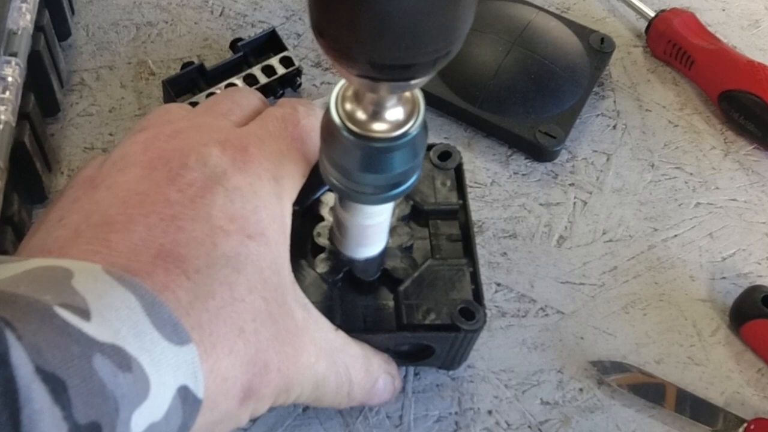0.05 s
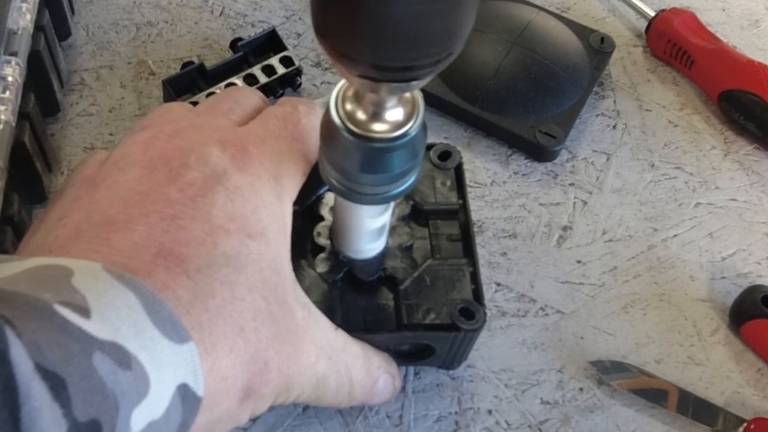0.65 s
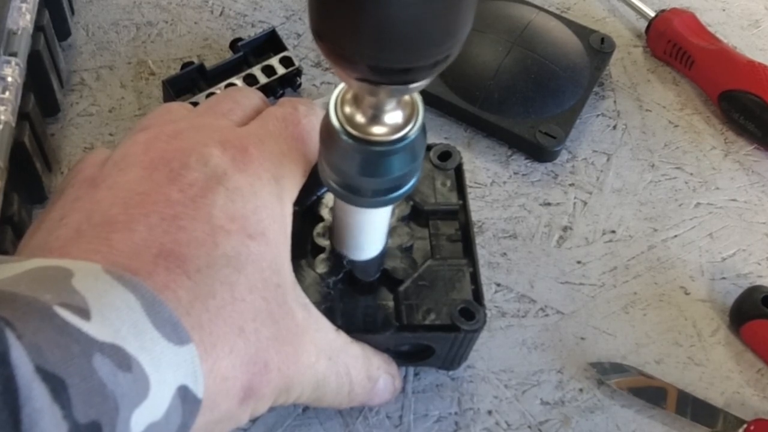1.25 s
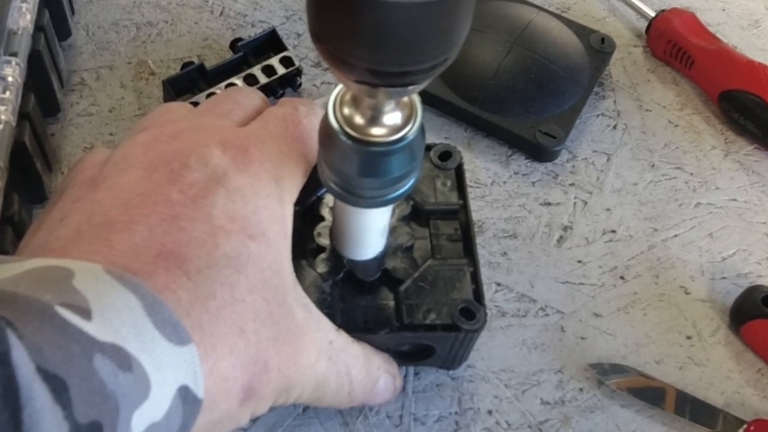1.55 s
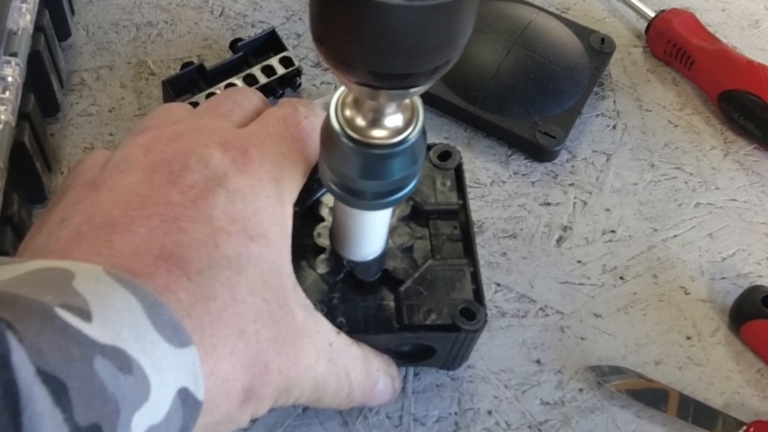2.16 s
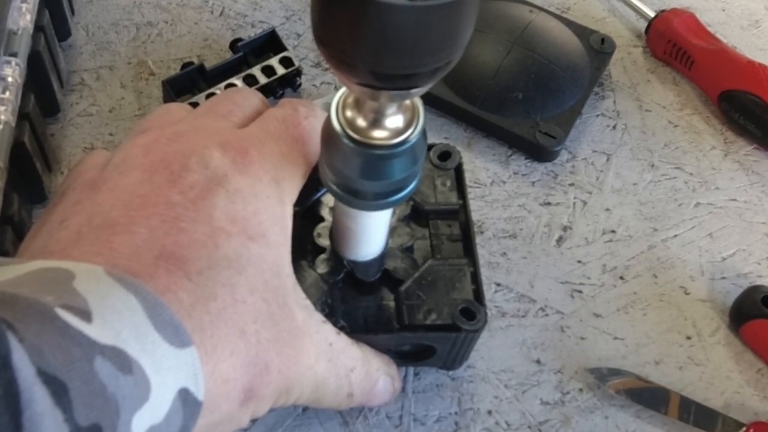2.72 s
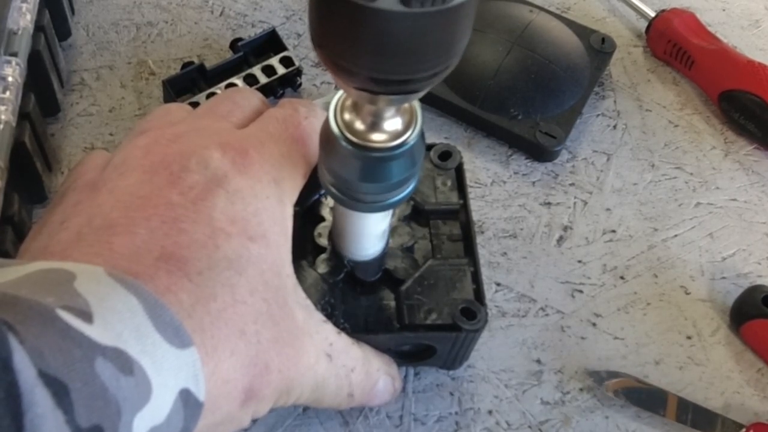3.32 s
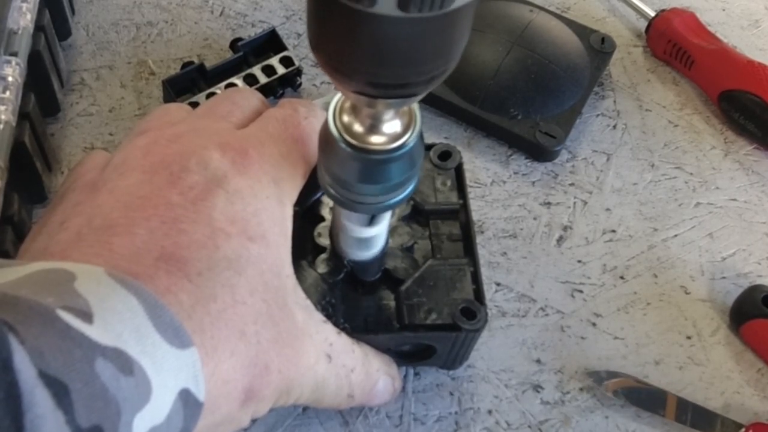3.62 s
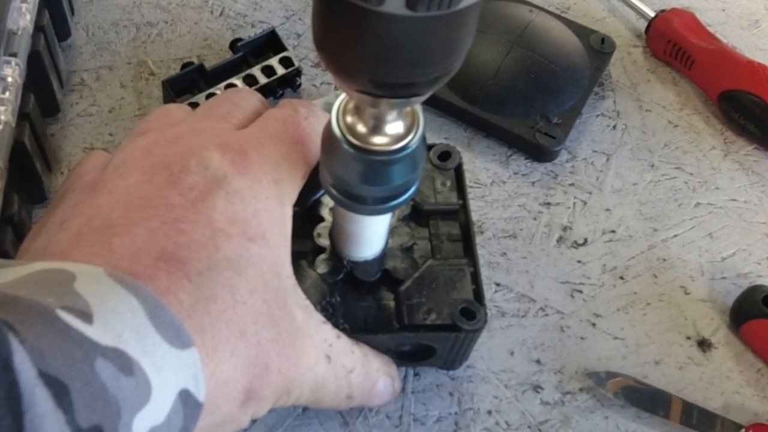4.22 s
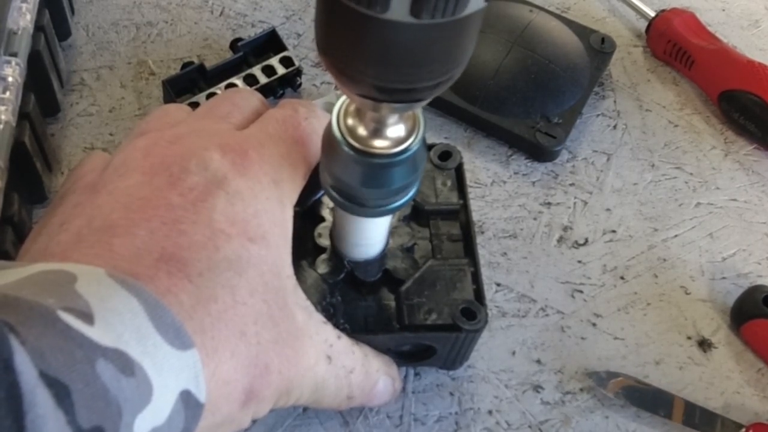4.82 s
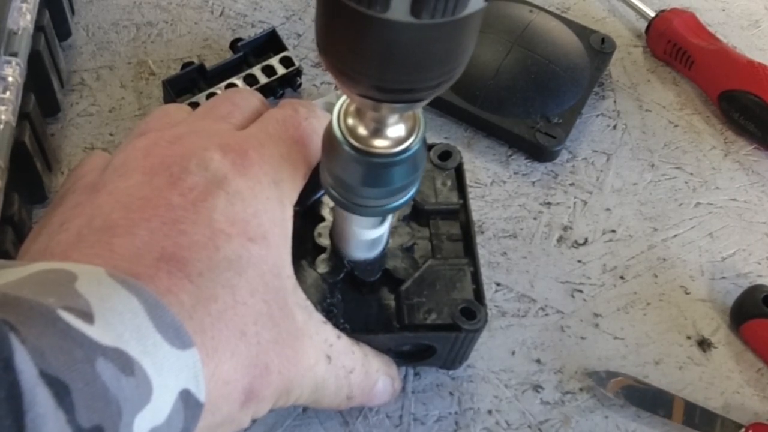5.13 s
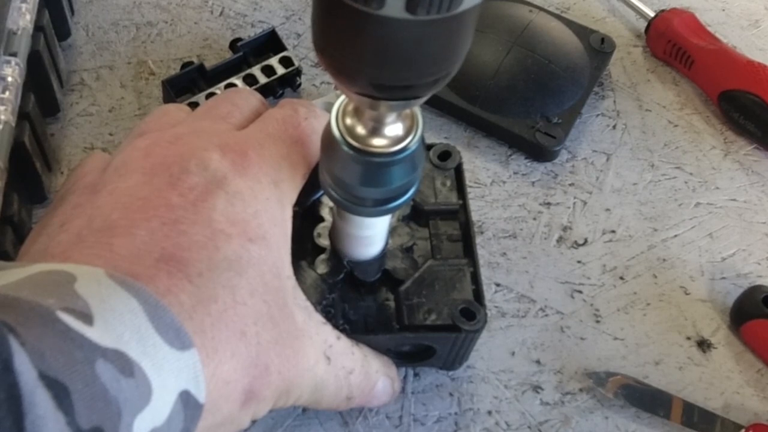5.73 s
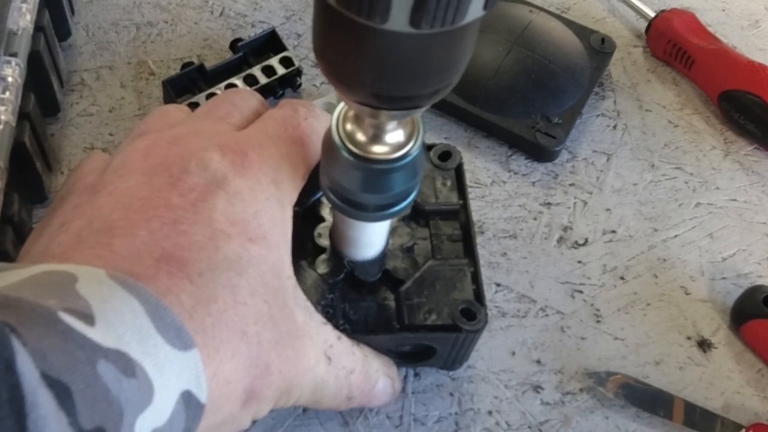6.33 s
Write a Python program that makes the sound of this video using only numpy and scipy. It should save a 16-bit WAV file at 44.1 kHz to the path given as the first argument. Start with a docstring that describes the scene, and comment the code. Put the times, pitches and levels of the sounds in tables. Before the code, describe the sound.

A cordless drill revs at once with a tiny gear chirp, then winds down until about 0.5 seconds. It runs briefly at part speed and reaches full speed by 0.8 seconds. From there it holds a high, throbbing gear whine with a steady motor hiss and a light rattle in its housing. A small hole saw scrapes into a plastic box, catching in a quick, even rhythm as it turns and biting firmly around 1.6 seconds. Harsher rubbing comes in spells near 2.7 seconds and from 3.3 to 4.4 seconds. A low chattering hum from the teeth grows until about 4.5 seconds, then calms as the saw sinks in. The box and workbench rumble underneath, with soft, rapid thumps around 2.4 seconds and near the end. The drill sags slightly in pitch and is still running at about 6.4 seconds. It sounds close, in a quiet workshop.

```python
"""A cordless drill whines and scrapes as it turns a small hole saw in a plastic box on a workbench.
The trigger is blipped, eased and then held. The gears make the throbbing whine, their rattle rings
the drill's housing, and the fan and brushes hiss. The saw catches at the same places of its groove
on every turn. Its teeth chatter more and more as they cut in, then calm down once they are sunk,
while the box and bench rumble underneath."""
import sys
import numpy as np
from scipy import signal
from scipy.fft import rfft, irfft
from scipy.io import wavfile
from scipy.ndimage import uniform_filter1d

SR = 44100
rng = np.random.default_rng(int(sys.argv[2]) if len(sys.argv) > 2 else 0)


def output_pcm(signal):
    """Save a mono or channel-first signal as 16-bit PCM at the path in sys.argv[1].

    Samples are clipped to [-1, 1] before scaling.
    """
    pcm = np.clip(np.atleast_2d(signal).T, -1, 1) * 32767
    wavfile.write(sys.argv[1], SR, np.round(pcm).astype(np.int16))


N = 285327
T = np.arange(N) / SR
HZ = np.fft.rfftfreq(N, 1 / SR)

FULL_SPEED = 285  # motor turns per second with the trigger held
MOTOR_PER_SAW_TURN, SAW_TEETH = 16.435, 11
HOUSING_HZ, HOUSING_WIDTH_HZ = 3970, 400  # where the drill's housing rings
PRESSED_S, SEATED_S, SUNK_S = 0.47, 1.67, 4.46  # the saw is pushed on, sits in its groove, is sunk in it
SHOVE_PLACE = 0.042  # how far through each turn the saw shoves the box, from 0 to 1
# The motor creeps on a half-pressed trigger. Each row: time in seconds, amount of creep from 0 to 1.
CREEP = [(.525, 0.36), (.56, 1), (.72, 1), (.76, 0)]


def amp(db):
    """Turns decibels into a gain."""
    return 10 ** (np.asarray(db) / 20)


def unit(x):
    """Scales a signal to an average (rms) size of 1."""
    return x / np.sqrt(np.mean(x ** 2) + 1e-20)


def curve(rows):
    """Joins rows of time and value with straight lines, sample by sample."""
    return np.interp(T, *np.transpose(rows))


def spectrum(rows):
    """Spreads rows of frequency and value over all frequencies."""
    hz, value = np.transpose(rows)
    return np.interp(np.log(HZ + 1), np.log(hz + 1), value)


def colour(x, rows):
    """Filters a sound so that it rings after a blow, never before; the result has size 1."""
    cepstrum = irfft(np.log(amp(spectrum(rows))), N)
    cepstrum[1:N // 2] *= 2
    cepstrum[N // 2 + 1:] = 0
    return unit(irfft(rfft(x) * np.exp(rfft(cepstrum)), N))


def wander(rate_hz):
    """A random wobble of size 1, mostly slower than the given rate."""
    return unit(irfft(rfft(rng.standard_normal(N)) / (1 + (HZ / rate_hz) ** 4), N))


def tone(turns):
    """A sine wave of size 1."""
    return np.sqrt(2) * np.sin(2 * np.pi * turns)


def until(end_s, fade_s):
    """Starts at 1 and fades to 0, arriving at end_s."""
    return np.clip((end_s - T) / fade_s, 0, 1)


def swells(rows):
    """A gain made of smooth swells, each with its own middle, length and level."""
    return np.sqrt(sum(amp(db) ** 2 * np.exp(-(2 * (T - s) / length) ** 2) for s, length, db in rows))


def passes(saw, place):
    """One click each time the saw passes a place in its turn."""
    return 1. * (np.diff((saw - place) % 1, prepend=0) < 0)


def stereo_noise():
    """White noise whose left and right sides are less alike in the treble."""
    # Each row: frequency in Hz, likeness of the two sides from 0 to 1.
    likeness = [(300, .98), (900, .94), (1400, .78), (2000, .8), (2600, .9), (3300, .85), (4500, .68),
                (6800, .62), (9000, .66), (10300, .55), (12500, .74), (15000, .68)]
    same = spectrum(likeness)
    mid, side = rfft(rng.standard_normal((2, N))) * np.sqrt([(1 + same) / 2, (1 - same) / 2])
    return irfft(np.array([mid + side, mid - side]), N)


def groove(saw, count=7, size=2400):
    """The groove's roughness comes round on each turn and is slowly cut into a new shape."""
    shapes = rng.standard_normal((count, size))
    stage = np.linspace(0, count - 1, N)
    place = (saw % 1 * size).astype(int)
    return sum(shape[place] * np.cos(np.pi / 2 * np.clip(stage - k, -1, 1))
               for k, shape in enumerate(shapes))


def workshop_air(level_db=-64):
    """Faint room noise, unrelated on the left and right."""
    # Each row: frequency in Hz, relative level in dB.
    air = [(20, -12), (130, -1), (600, 1.5), (1500, -15), (4000, -3), (12000, -21)]
    return amp(level_db) * colour(rng.standard_normal((2, N)), air)


def bench_rumble(saw, speed_db, bite_db, pull):
    """Box and bench rumble with speed, jump when the motor pulls, and steady under pressure and bite."""
    # How box and bench ring. Each row: frequency in Hz, relative level in dB.
    bench = [(20, -9), (52, -42), (68, -12), (85, -8), (105, 0), (140, 1.5), (170, -9.5), (270, -16),
             (345, -9.5), (400, -9), (480, -11), (700, -30)]
    level_db = -55 + 1.4 * speed_db - 0.39 * bite_db + 10 * pull + 3 * until(PRESSED_S, 0.05)
    return amp(level_db) * colour(groove(saw) + 0.24 * rng.standard_normal(N), bench)


def box_knocking(saw, speed_db, shudders_per_turn=7):
    """The box shudders under the hand and thumps in spells: a kick as the motor starts, then as the saw shoves
    it once a turn."""
    # How much the box rocks. Each row: time in seconds, relative level in dB.
    rocking = [(0.95, -61), (1.34, -50.5), (3.03, -57.5), (4.73, -65), (5.94, -48.5), (6.38, -50),
               (6.4, -56)]
    # Spells of thumping: first a brief kick as the motor jumps into motion, then spells of the saw shoving the
    # box. Each row: middle in seconds, length in seconds, level in dB.
    thump_spells = [(.04, 0.068, -49.5), (2.4, 1.4, -50.5), (4.7, .8, -54.5), (6.4, 0.9, -55.5)]
    # The sound of one shove. Each row: frequency in Hz, relative level in dB.
    thump = [(20, -38), (50, -26), (80, 14), (130, 5), (250, -30), (400, -5), (520, -5.5), (750, 0),
             (1500, -2), (4000, -38)]
    angle = 2 * np.pi * (saw - SHOVE_PLACE)
    shudder = amp(curve(rocking) - 1 + 2.3 * speed_db) * np.cos(shudders_per_turn * angle)
    return shudder + swells(thump_spells) * colour(passes(saw, SHOVE_PLACE), thump)


def tooth_chatter(saw, speed_db, rise_db_per_s=1.6, fall_db_per_s=14, buzzes_per_turn=40):
    """The teeth shake the box: a hum that grows as they cut in and calms once sunk, and a light buzz."""
    # The chatter's other tones. Each entry: pitch as a multiple of the saw's speed.
    multiples = [5, 8, 13, 19, 21, 22, 25, 33, 44]
    # Each entry: that tone's relative level in dB.
    levels = [-6.5, -13, 1.5, 2, -3.5, -20, -8.5, -6, -3.5]
    # Each entry: the share of the calming that tone follows (below 0, it grows instead).
    calming = [-.3, 0.083, 0.59, 0.83, 0.0088, 0.064, 0.076, 0.79, 1]
    calm_db = np.maximum(-fall_db_per_s * np.maximum(T - SUNK_S, 0), -16)
    pressed = amp(-8 * until(PRESSED_S, 0.04))
    contact = amp(2.3 * speed_db - 6 * until(SEATED_S, 0.99))
    angle = 2 * np.pi * (saw - SHOVE_PLACE)  # the low tones peak together at the shove
    hum_db = -45.5 + speed_db + 5 * curve(CREEP) - rise_db_per_s * np.maximum(SUNK_S - T, 0) + calm_db
    hum = amp(hum_db) * np.sqrt(2) * np.cos(SAW_TEETH * angle) * (1 + 0.07 * np.cos(angle))
    tones = np.zeros(N)
    for multiple, db, share in zip(multiples, levels, calming):
        lag = 0.055 * max(multiple - 13, 0) ** 2  # the box delays the high tones more and more
        tones += amp(db + share * calm_db + wander(3.1)) * np.sqrt(2) * np.cos(multiple * angle - lag)
    buzz = tone(buzzes_per_turn * saw + 0.097 * wander(5.6))
    return pressed * (hum + contact * (amp(-56) * tones - amp(-59) * buzz))


def saw_scraping(saw, speed_db, bite_db, grab_turns=0.038):
    """The teeth rub the groove and knock at its high spots; the box's floor and wall ring."""
    # Where the saw catches. Each row: place in the turn from 0 to 1, relative strength in dB.
    catches = [(0.051, -3), (0.167, -3), (0.273, -5), (0.549, 0.5), (.82, -8.5), (.92, 0), (0.981, -11)]
    # How the floor of the box rings. Each row: frequency in Hz, relative level in dB.
    floor = [(120, -29), (200, -0.5), (250, 3.5), (310, 1), (400, 4.5), (510, -15.5), (600, -0.5),
             (740, -0.5), (950, 2), (1220, 1.5), (1500, -7), (2300, -11), (3500, -13), (8000, -54)]
    # How its wall rings. Each row: frequency in Hz, relative level in dB.
    wall = [(700, -31.5), (1000, -4), (1120, 3.5), (1230, 5.5), (1330, -1.5), (1500, -10), (1700, -8),
            (2000, -19.5), (3000, -46)]
    # Spells of rubbing the wall. Each row: middle in seconds, length in seconds, relative level in dB.
    rubs = [(0.197, 0.13, -47.5), (1.546, .5, -55), (2.697, 0.24, -44.5), (3.33, 0.16, -46),
            (3.66, .34, -46), (4.25, .5, -49), (6.35, 0.13, -56)]
    scrape_db = -45 + speed_db + 0.59 * bite_db
    grip = np.clip(amp(scrape_db + 47), 0, 1) ** 2  # a harder scrape catches harder, up to a limit
    pressure = 1 + 0.21 * np.cos(2 * np.pi * SAW_TEETH * saw)
    knocks = np.zeros(N)
    for place, db in catches:
        strength = grip * amp(db + 2.1 * wander(2.6))
        pressure += 2.1 * strength * np.exp(-((saw - place) % 1) / grab_turns)
        knocks += strength * passes(saw, place)
    roughness = unit(groove(saw) + 0.52 * rng.standard_normal(N))
    force = pressure * roughness - 10 * knocks
    wall_gain = amp(-3) * np.hypot(amp(-53 + 0.79 * speed_db), swells(rubs))
    return amp(scrape_db) * colour(force, floor) + wall_gain * colour(force, wall)


def motor_noise(saw, speed_db, pull, slack):
    """Fan and brushes hiss; rattling gears ring the housing, more so while they run slack."""
    # The hiss of fan and brushes. Each row: frequency in Hz, relative level in dB.
    fan = [(200, -1), (900, 3.5), (1600, 7.5), (2100, 8), (2600, 8), (3200, 7), (4300, 2), (5300, 1),
           (6900, -5.5), (7800, 4.5), (8800, 2.5), (10600, 4.5), (11700, -4), (15800, -6.5)]
    # How the housing rings. Each row: frequency in Hz, relative level in dB.
    housing = [(2400, -38.5), (3000, -6.5), (3300, 0.5), (3600, 0), (3900, 1.5), (4150, -6), (4600, -18),
               (6000, -58)]
    level_db = -43.5 + 0.9 * speed_db + 3 * pull - np.maximum(T - SUNK_S, 0)  # eases once the saw is sunk
    ring = amp(slack - 2) * colour(stereo_noise(), housing)
    rattle = 1 + 0.14 * wander(180) + 0.18 * slack * wander(50)
    hiss = colour(stereo_noise(), fan) * (1 + 0.055 * np.cos(2 * np.pi * saw))
    return amp(level_db) * (ring * rattle + hiss)


def gear_squeaks():
    """The gears take up their slack with tiny chirps that rise through the housing's pitch."""
    # Each row: middle in seconds, level in dB, half-length in seconds, pitch rise in Hz per second.
    jolts = [(0.014, -34.5, 0.011, 50000), (.037, -33, 0.0045, 44300), (0.489, -45.5, 0.02, 25000),
             (0.52, -39.5, 0.012, 25000)]
    squeaks = np.zeros(N)
    for middle, db, width, rise in jolts:
        t = T - middle
        squeaks += amp(db) * np.exp(-(t / width) ** 2) * tone(HOUSING_HZ * T + rise / 2 * t ** 2)
    return squeaks


def gear_whine(speed, motor, pull, coast, meetings_per_turn=12, throbs_per_turn=0.04408):
    """Gear teeth meet in a whine that throbs as an off-centre gear turns and sputters when coasting."""
    # The housing passes some pitches better. Each row: pitch of the whine in Hz, base level in dB.
    housing_path = [(1650, -72), (1850, -69), (2000, -46.5), (2170, -44.5), (2500, -65), (2880, -47.5),
                    (3050, -44.5), (3300, -42), (3430, -45), (3520, -46), (3700, -39.5), (3900, -32)]
    # The whine's throb. Each row: time in seconds, depth from 0 to 1.
    throb_depth = [(.7, .2), (.86, 0.4), (2.2, 0.68), (2.8, 0.67), (5.3, 0.62), (6.15, 0.57)]
    level_db = np.interp(meetings_per_turn * speed, *np.transpose(housing_path)) + 2 * pull - 3 * coast
    depth = curve(throb_depth)
    swing = 2 * np.pi * (throbs_per_turn * motor + 0.47)
    sway = 0.32 * depth * np.sin(swing)  # the pitch swings along with the throb
    throb = np.sqrt(1 + depth ** 2 + 2 * depth * np.cos(swing))  # round swells, brief dips
    jitter = 0.018 * wander(40) + 0.07 * wander(8)
    flutter = 1 + 0.12 * wander(170) + 0.08 * wander(25)
    sputter = 1 + 0.21 * coast * wander(45)
    return amp(level_db) * throb * flutter * sputter * tone(meetings_per_turn * motor + sway + jitter)


def gear_train(speed, motor, pull, coast, bite_db, flare_db=17):
    """The whine plus weaker gear tones that come up as the saw sinks; a firm bite damps them all."""
    # The weaker tones. Each entry: pitch as a multiple of the motor's speed.
    multiples = [6, 9, 17, 22, 24, 29, 36]
    # Each entry: that tone's base level in dB.
    levels = [-65, -56, -74.5, -71.5, -71, -68.5, -71.5]
    # Each entry: the dB added to that tone while the motor creeps.
    creep_boosts = [0, -12, 30, 0, 14.5, 6, 19]
    creep, pace = curve(CREEP), speed / FULL_SPEED
    rise_db_per_s = 0.75 - 0.5 * creep
    drive = pace ** 3 * amp(-rise_db_per_s * np.maximum(SUNK_S - T, 0))
    sound = gear_whine(speed, motor, pull, coast)
    for multiple, db, boost_db in zip(multiples, levels, creep_boosts):
        # tones above the whine flare as they sweep through the housing's pitch
        detuning = 2 * (multiple * speed - HOUSING_HZ) / HOUSING_WIDTH_HZ
        flare = amp(flare_db) / (1 + detuning ** 2) * (multiple > 12)
        gain = amp(db) * (drive * amp(boost_db * creep) + flare * pace)
        sound += gain * (1 + 0.28 * wander(50)) * tone(multiple * (motor + 0.01 * wander(35)))
    return sound * amp(-0.36 * bite_db)


def pull_and_coast(speed, hard_pull=6600, free_fall=500):
    """How hard the motor speeds up and how freely it runs down, each from about 0 to 1."""
    change = np.gradient(speed) * SR  # turns per second gained each second, like the two settings
    pull = uniform_filter1d(np.maximum(change, 0), int(0.025 * SR)) / hard_pull
    coast = np.clip(-uniform_filter1d(change, int(0.032 * SR)) / free_fall, 0, 1)
    return pull, coast


def scene():
    """One motor drives the gears and, geared down, the saw; speed and bite shape their levels."""
    # The trigger is blipped, let go, half pressed, held. Each row: time in seconds, turns per second.
    motor_speed = [(0.0, 140.7), (0.018, 177.52), (0.05, 298.87), (0.092, 329.34), (0.19, 287.85),
                   (0.48, 123.88), (0.545, 217.38), (0.72, 217.39), (0.765, 279.27), (0.85, 291.37),
                   (1.55, 289.39), (2.15, 291.12), (2.75, 288.42), (3.2, 284.39), (3.9, 283.55),
                   (4.3, 284.85), (4.8, 282.91), (5.35, 285.42), (5.9, 282.18), (6.33, 274.91)]
    # How hard the teeth bite the plastic. Each row: time in seconds, relative level in dB.
    bite = [(0.85, -45.5), (1.1, -47), (1.65, -40.5), (2.44, -45), (3.29, -41.5), (4.59, -43), (5.27, -47),
            (6.29, -46.5), (6.4, -43.5)]
    speed = curve(motor_speed)
    motor = np.cumsum(speed) / SR  # motor and saw count the turns each has made
    motor -= np.interp(3, T, motor)  # turn zero falls at 3 seconds
    saw = motor / MOTOR_PER_SAW_TURN
    speed_db = 20 * np.log10(speed / FULL_SPEED)
    bite_db = curve(bite) + 40.5  # 0 dB is the firmest bite
    pull, coast = pull_and_coast(speed)
    slack = (coast + curve(CREEP)) * speed / FULL_SPEED
    gears = gear_train(speed, motor, pull, coast, bite_db) + gear_squeaks()
    drill = gears + motor_noise(saw, speed_db, pull, slack)
    scrape = saw_scraping(saw, speed_db, bite_db)
    rumble = bench_rumble(saw, speed_db, bite_db, pull)
    shaking = tooth_chatter(saw, speed_db) + box_knocking(saw, speed_db)
    return drill + scrape + rumble - shaking + workshop_air()


def record(dry, top_hz=15920):
    """Puts left and right slightly out of step and cuts off the highest treble."""
    # Each row: frequency in Hz, how far the left side leads in radians.
    left_lead = [(0, 0), (110, -.02), (190, -.12), (300, -.05), (500, -.13), (750, -.1), (1460, -.15),
                 (1900, 0), (3000, -.05), (3500, -.2), (4130, -1.7), (4900, .3), (7300, 0), (9000, -.3),
                 (10200, -.9), (11500, 0)]
    shift = np.exp(0.5j * spectrum(left_lead))
    stereo = irfft(rfft(dry) * np.array([shift, 1 / shift]), N)
    lowpass = signal.firwin(1023, top_hz, window=("kaiser", 9), fs=SR)
    return signal.oaconvolve(stereo, lowpass[None], "same")


dry = scene()
out = record(dry)
output_pcm(out)
```